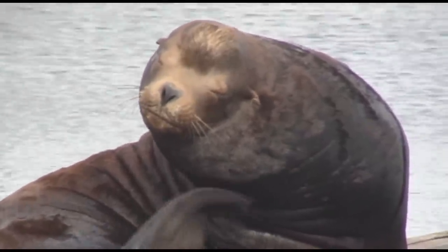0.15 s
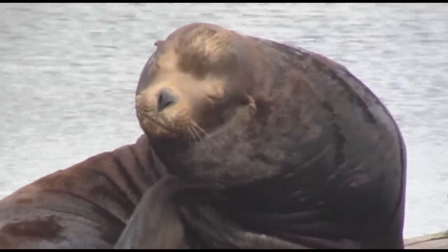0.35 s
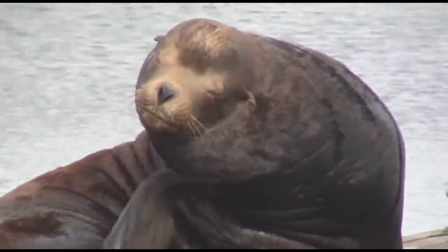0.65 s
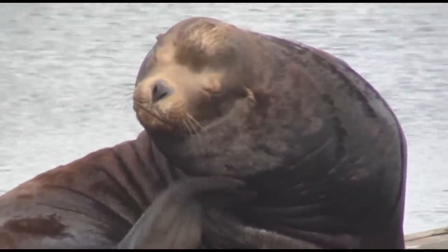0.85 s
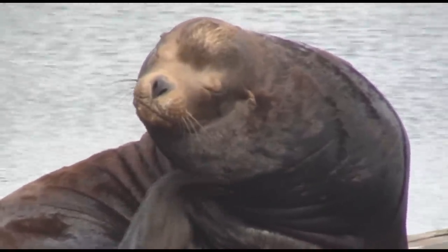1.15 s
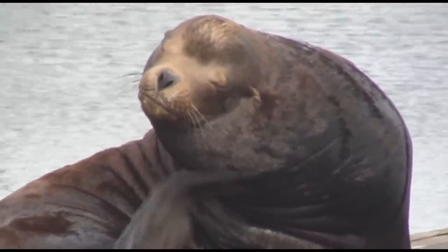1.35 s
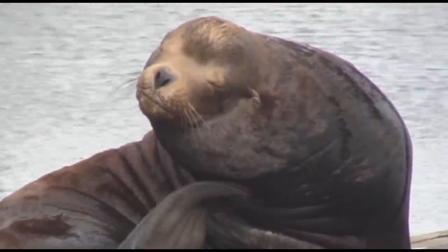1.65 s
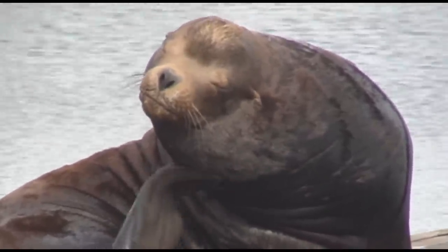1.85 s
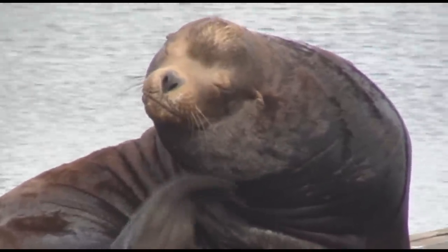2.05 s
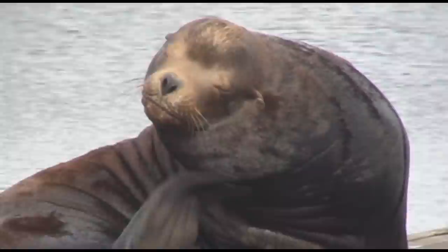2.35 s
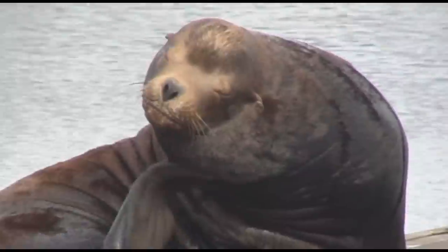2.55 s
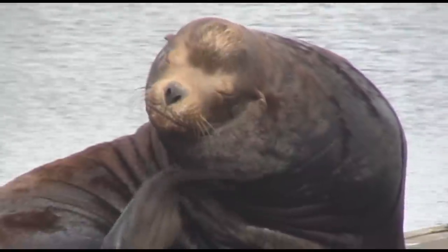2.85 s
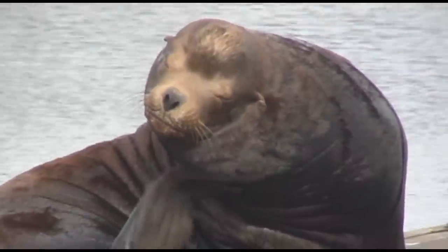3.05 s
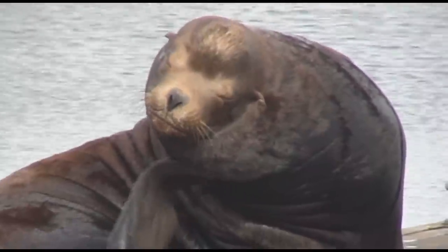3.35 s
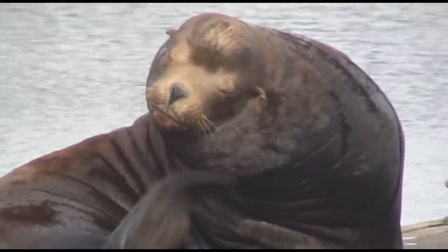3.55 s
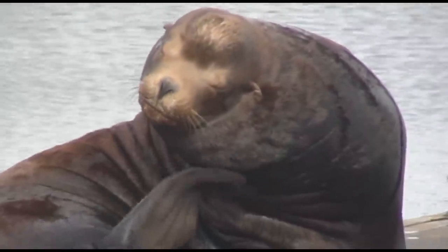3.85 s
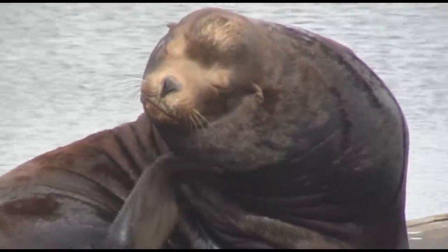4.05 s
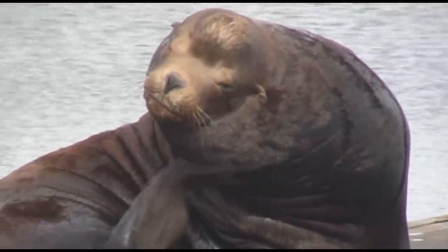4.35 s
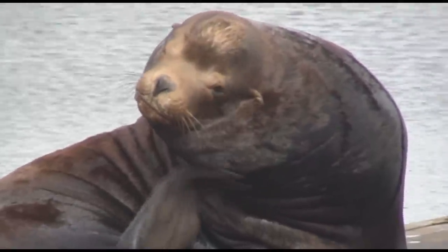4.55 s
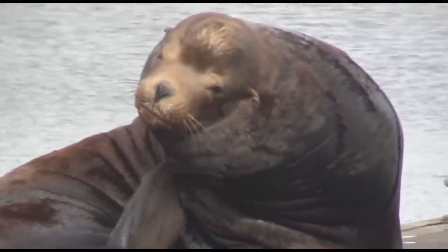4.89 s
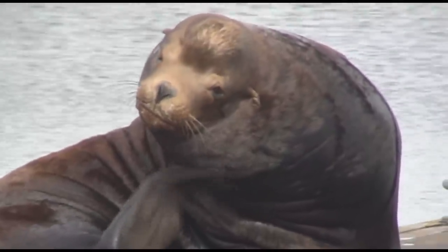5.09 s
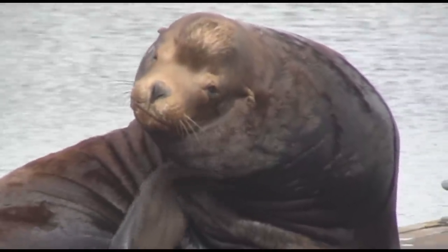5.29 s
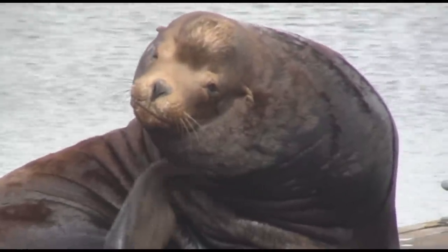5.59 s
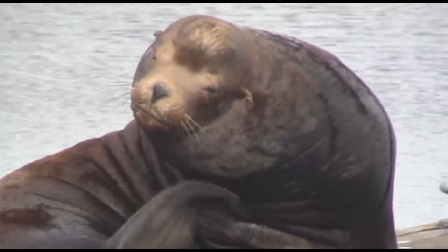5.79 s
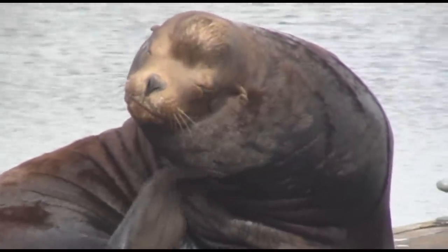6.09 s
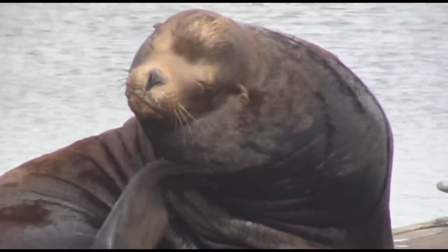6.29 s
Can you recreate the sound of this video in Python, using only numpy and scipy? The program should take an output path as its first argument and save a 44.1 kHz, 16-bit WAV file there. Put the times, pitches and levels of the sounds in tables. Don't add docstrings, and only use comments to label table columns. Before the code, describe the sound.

A sea lion barks a quick, even run of short hoarse yelps across an echoing harbour, over engine hum and wind buffets, then falls silent.

```python
import sys
import numpy as np
from scipy import signal
from scipy.fft import rfft, irfft, next_fast_len
from scipy.io import wavfile
from scipy.ndimage import uniform_filter1d

SR = 44100
rng = np.random.default_rng(int(sys.argv[2]) if len(sys.argv) > 2 else 0)


def field_ratio(decibels):
    return 10 ** (np.asarray(decibels, dtype=float) / 20)


def master_out(mix):
    frames = np.transpose(np.atleast_2d(mix))
    ceiling = np.clip(frames, -1, 1)
    pcm = np.round(ceiling * 32767).astype(np.int16)
    wavfile.write(sys.argv[1], SR, pcm)


N = 283412
T = np.arange(N) / SR
LEAD = int(.2 * SR)
T_CALL = np.arange(-LEAD, N) / SR


def rms_one(x):
    return x / np.sqrt(np.mean(x ** 2, axis=-1, keepdims=True) + 1e-20)


def at_hz(points, hz):
    freq_hz, level_db = np.array(points)[:, :2].T
    return np.interp(np.log(hz + 1), np.log(freq_hz), level_db)


def coloured(x, points):
    size = next_fast_len(x.shape[-1] + 4096)
    gain = field_ratio(at_hz(points, np.fft.rfftfreq(size, 1 / SR)))
    return irfft(rfft(x, size) * gain, size)[..., :x.shape[-1]]


def drift(rate_hz, size=N):
    r = np.exp(-2 * np.pi * rate_hz / SR)
    noise = rng.standard_normal(size + 9000)
    return rms_one(signal.lfilter([1], [1, -2 * r, r * r], noise)[9000:])


def port_difference(left_minus_right_db):
    return field_ratio(left_minus_right_db * np.array([[.5], [-.5]]))


def played(rows):
    s, hz, level_db = np.transpose(rows)
    span = slice(int(s[0] * SR) + LEAD, int(s[-1] * SR) + LEAD)
    t = T_CALL[span]
    pitch = uniform_filter1d(np.interp(t, s, hz), size=260, mode="nearest")
    phase = 2 * np.pi * np.cumsum(pitch) / SR
    fade = np.clip(np.minimum(t - s[0], (s[-1] - t) / 3) / .004, 0, 1)
    return span, pitch, phase, np.interp(t, s, field_ratio(level_db)) * fade


def bark_contour(start, ledge_s, arch_s, top_hz, level_db, scoop):
    jump, end = start + ledge_s, start + ledge_s + arch_s
    lost = (1270 - top_hz) / 100
    tired = max(lost, 0)
    ledge_hz, end_hz = 1030 - 39.8 * lost, 849
    half_jump_s = .011
    shoulder_hz = (.945 + .028 * tired) * top_hz
    drop_s = .027 + .008 * tired
    sag_hz = .978 * top_hz
    falling_db = level_db - 2.5 * lost
    return [(start, ledge_hz - scoop * 210, level_db - 9.5),
            (start + .45 * scoop * ledge_s, ledge_hz - scoop * 55.6, level_db - scoop * 8.5),
            (jump - half_jump_s, ledge_hz, level_db),
            (jump + half_jump_s, shoulder_hz, level_db - 4.5),
            (end - drop_s - .18 * arch_s, top_hz, level_db - 7),
            (end - drop_s, sag_hz, level_db - 4.5),
            (end - drop_s / 2, (sag_hz + end_hz) / 2, falling_db),
            (end, end_hz, falling_db)]


# start_s [s], ledge_s [s], arch_s [s], top_hz [Hz], level_db [dB]
BARKS = [(-.165, 0.062, .12, 1315, -33), (0.161, 0.068, 0.13, 1320, -28.5),
         (0.506, 0.066, 0.13, 1337, -29.5), (0.843, 0.073, 0.11, 1325, -29.5),
         (1.156, 0.074, 0.11, 1297, -30), (1.48, 0.076, 0.1, 1286, -29), (1.792, 0.076, .100, 1285, -27.5),
         (2.110, 0.068, 0.1, 1290, -28), (2.422, 0.069, 0.096, 1253, -28.5),
         (2.724, 0.07, 0.096, 1268, -29), (3.04, .067, .094, 1257, -28), (3.366, 0.07, 0.091, 1232, -28.5),
         (3.693, 0.065, 0.094, 1209, -29), (4.034, .067, 0.089, 1172, -29),
         (4.407, 0.072, 0.067, 1139, -31)]
# time_s [s], strong_weak_depth [0-1], overtones_db [dB], scoop [0-1]
TIRING = [(-.1, 0.16, 9.5, 0.49), (.2, 0.07, 2.5, 0.39), (.55, 0.11, 0.5, 0.55), (.9, 0.08, -1, 1.0),
          (2.598, 0.15, 4, 0.91), (3.8, 0.3, 3, .9), (4.1, 0.47, -2, .9), (4.45, 0.13, 5.5, .8)]
# freq_hz [Hz], level_db [dB]
THROAT = [(300, 2), (600, -4.5), (850, 11.5), (1050, 7), (1350, -6), (1750, -10), (2100, -31), (2550, -19),
          (2850, -26), (3150, -21.5), (3500, -23.5), (3850, -29), (4400, -44.5), (7700, -35.5)]


def barks():
    source = np.zeros(N + LEAD)
    s, *folds = np.transpose(TIRING)
    for bark in BARKS:
        beating, bright_db, scoop = (np.interp(bark[0], s, column) for column in folds)
        ledge_s = bark[1]
        span, pitch, phase, gain = played(bark_contour(*bark, np.clip(scoop, .1, 1.2)))
        size = len(pitch)
        age = np.arange(size) / SR
        progress = age / age[-1]

        def waver(rate_hz):
            return drift(rate_hz, size=2 * LEAD)[:size]

        rattle_s = .6 * ledge_s * np.clip(scoop + 0.25, 0, 1)
        rough = np.clip((rattle_s + .008 - age) / .016, 0, 1)
        phase = phase + (.05 + .25 * beating + .5 * rough) * waver(90)
        puffs = np.exp(3 * np.cos(phase / 4 + 1.5 * waver(30)) - 3)
        bursts = 1 + .8 * rough * (2.2 * puffs - 1)
        half = beating * (.15 + 1.2 * np.exp(-((progress - .48) / .25) ** 2))
        strong_weak = 1 + 2 * half * np.cos(phase / 2 + .7 * waver(70))
        ledge_bright_db = 2 * np.clip((ledge_s - age) / .011, 0, 1)
        closing = field_ratio(ledge_bright_db - 2 * np.clip(progress * 6 - 4.6, 0, 1))
        overtones = 0
        for k in range(2, 9):
            level_db = 2 - 1.5 * k - 8 * (k in (5, 7)) + 2.5 * (k in (3, 4))
            overtones = overtones + field_ratio(4 * waver(50) + level_db) * np.cos(k * phase + k * k)
        air = np.diff(rng.standard_normal(2 * LEAD))[:size]
        rasp = field_ratio(-6 + 5 * rough) * air * (1 + np.cos(phase))
        effort = gain * field_ratio(2 * waver(58) - at_hz(THROAT, pitch))
        voice = np.cos(phase) + field_ratio(bright_db) * closing * overtones + rasp
        source[span] += np.sqrt(2) * effort * bursts * strong_weak * voice
    return coloured(source, THROAT)


# delay_s [s], left_db [dB], right_db [dB]
ECHOES = [
    (.025, -12, -13),
    (.062, -23, -21),
    (.102, -24, -17),
]
# freq_hz [Hz], level_db [dB]
WALLS = [(500, -2), (850, -2), (1050, 1), (1300, 0), (2550, 6), (3200, 8), (3800, 7), (8000, -3)]


def harbour(x):
    tail_t60_s, tail_db, shared = .95, np.array([-11.5, -9.5]), .4
    size = int(.9 * SR)
    t = T[:size]
    scatter = rng.standard_normal((3, size))
    decay = field_ratio(-60 * t / tail_t60_s) * np.clip(t / .04, 0, 1)
    tail = (scatter[:2] + shared * scatter[2]) * decay
    paths = field_ratio(tail_db)[:, None] * rms_one(tail) / np.sqrt(size)
    for delay_s, left_db, right_db in ECHOES:
        arrival = int(delay_s * SR) + rng.integers(0, 12, 2)
        paths[[0, 1], arrival] += field_ratio(np.array([left_db, right_db]))
    wet = signal.fftconvolve(coloured(x, WALLS)[None], paths, axes=1)[:, :len(x)]
    direct = x * field_ratio(np.array([[-.2], [.2]]))
    return (direct + wet)[:, LEAD:]


ENGINE_ORDERS = {4: (-58, -57), 6: (-43, -28), 7: (-60, -50), 8: (-60, -50), 9: (-51, -40.5),
                 10: (-66, -61), 12: (-62, -53), 13: (-66, -59), 16: (-62, -57), 17: (-68, -64),
                 20: (-67, -61), 24: (-65, -68)}


def engine():
    cycle_hz = 15.025
    left_lead_rad = np.array([[1.1], [0]])
    phase = 2 * np.pi * cycle_hz * T + 0.021 * drift(1)
    out = np.zeros((2, N))
    for k, level_db in ENGINE_ORDERS.items():
        wobble = field_ratio(0.17 * drift(2.7))
        wave = np.sin(k * phase + rng.uniform(0, 2 * np.pi) + left_lead_rad)
        out += np.sqrt(2) * field_ratio(np.array(level_db))[:, None] * wobble * wave
    return out


# freq_hz [Hz], density_db [dB per Hz]
BUFFET = [(22, -21), (45, 7.5), (80, 4.5), (130, 5), (200, -6.5), (300, -15.5), (500, -22), (1500, -104)]
# peak_s [s], level_db [dB], left_minus_right_db [dB], half_length_s [s]
GUSTS = [(0.005, -27.5, 14, 0.036), (.2, -32.5, 3, 0.13), (0.661, -38, 4, 0.056), (0.942, -31.5, 5, 0.11),
         (1.253, -30.5, -1, 0.088), (1.478, -30, -6, 0.028), (1.782, -36.5, 0, 0.14),
         (2.09, -32, -1, 0.084), (2.743, -34.5, -1.5, 0.25), (3.076, -44.5, -10, 0.11),
         (3.438, -27.5, 3.5, 0.11), (3.73, -33, -1, 0.11), (4.203, -47.5, 4, 0.25),
         (4.602, -40.5, 23.5, 0.091), (5.084, -41, -8, 0.12), (5.26, -33, 1, 0.076), (5.54, -48, -3, 0.11),
         (5.92, -42, -1, 0.11), (6.38, -40.5, 2, 0.16)]
# left, right [dB]
CALM_DB = [-56.5, -56.5]
# time_s [s], peak_db [dB], pitch_hz [Hz], left_minus_right_db [dB], length [cycles]
THUMPS = [(0.016, -16.5, 199, 5, 0.51), (0.09, -29.5, 121, 18, 0.21), (0.268, -18, 126.3, 9, 0.52),
          (0.657, -22.5, 125, 7, 0.95), (0.933, -23, 118, 12, 0.43), (1.045, -28, 116, 18, 0.67),
          (1.202, -25.5, 121, 20, 0.39), (1.307, -21, 141, 4, 0.9), (2.073, -16.5, 181, 11, 0.32),
          (2.163, -21, 120, -2, 0.51), (2.692, -34, 122, 27, 1), (2.854, -27.5, 141, 18, 0.6),
          (3.139, -21, 117, 2, 0.79), (3.378, -18.5, 122, 4, 0.68), (3.48, -18, 133, 4, 0.39),
          (4.569, -16, 148, 5, 0.71), (4.649, -21, 133, 0, 0.48), (5.284, -16.5, 143, 10, 0.54)]


def wind():
    white = rng.standard_normal((3, N))
    lumps = field_ratio(4 * np.array([drift(20), drift(12)]))
    buffeting = rms_one(coloured(white[:2] + 1.02 * white[2], BUFFET))
    strength = field_ratio(np.array(CALM_DB))[:, None]
    for at, gust_db, pan_db, half_s in GUSTS:
        swell = np.exp(-((T - at) / half_s) ** 2)
        strength = strength + field_ratio(gust_db) * port_difference(pan_db) * swell
    out = rms_one(buffeting * lumps) * strength
    for at, peak_db, hz, pan_db, cycles in THUMPS:
        turns = (T - at) * hz - .8
        eddy = -np.exp(-(turns / cycles) ** 2) * np.cos(2 * np.pi * turns)
        out += field_ratio(peak_db - 3) * port_difference(pan_db) * eddy
    return out


# freq_hz [Hz], density_db [dB per Hz]
FAR = [(88, -35), (150, -8.5), (186, -9.5), (346, -9.5), (397, -11), (574, -11.5), (646, -13.5),
       (971, -13.5), (1050, -16.5), (1610, -22), (9280, -37.5), (13400, -31.5), (15700, -33.5)]


def far_hiss():
    level_db, alike = -45, .2
    mid, side = rng.standard_normal((2, N))
    pair = np.sqrt(1 + alike) * mid + np.sqrt(1 - alike) * side * [[1], [-1]]
    return field_ratio(level_db + .5 * drift(0.33)) * rms_one(coloured(pair, FAR))


# time_s [s], pitch_hz [Hz], level_db [dB]
GRUNTS = [
    [(.715, 701, -60), (.735, 731, -37), (.75, 675, -35), (.765, 670, -60)],
    [(.74, 443, -66), (.765, 448, -44.5), (.79, 467, -43.5), (.815, 405, -55)],
    [(.71, 1313, -36), (.76, 1345, -52), (.82, 1298, -39), (.89, 1285, -36)],
]
GRUNT_TILT_DB = [-10.5, -2, -22]


def grunts():
    out = np.zeros(N + LEAD)
    for rows, tilt_db in zip(GRUNTS, GRUNT_TILT_DB):
        span, pitch, phase, gain = played(rows)
        stack = sum(field_ratio(tilt_db * k) * np.cos((k + 1) * phase + k * k) for k in range(8))
        out[span] += gain * stack
    return out


# start_s [s], end_s [s], pitch_hz [Hz], level_db [dB], fading [dB per s]
WHINES = [
    (1.0, 1.62, 10070, -76, 1),
    (5.95, 6.43, 10070, -75, 1),
    (2.78, 2.86, 5610, -62, 80),
    (3.115, 3.25, 5610, -55, 140),
    (3.41, 3.53, 5610, -71, 15),
]


def motor_whines():
    out = np.zeros(N)
    for start, end, hz, level_db, fading_db in WHINES:
        flutter = field_ratio(2.5 * drift(45))
        gate = np.clip(np.minimum(T - start, (end - T) / 4) / .012 + .5, 0, 1)
        level = field_ratio(level_db - fading_db * np.abs(T - start))
        out += np.sqrt(2) * level * flutter * gate * np.sin(2 * np.pi * hz * T)
    return out


# time_s [s], level_db [dB]
TICKS = [
    (3.2654, -33),
    (6.272, -35.5),
]
# freq_hz [Hz], level_db [dB], t60_s [s]
CASE = [(997, 8, 0.017), (1290, 3, 0.045), (3110, 2.5, 0.009), (4650, -7.5, 0.016), (6200, -7, .005),
        (8070, 1.5, 0.0036), (10000, -8, 0.0048), (11600, -0.5, 0.0062), (14000, -7, .003)]


def case_ticks():
    out = np.zeros(N)
    for hz, level_db, t60 in CASE:
        clicks = np.full(N, 1e-18)
        for at, tick_db in TICKS:
            start = int((at + 1.6 / hz) * SR)
            clicks[start] += field_ratio(tick_db + level_db)
            clicks[start + int(.009 * SR)] += field_ratio(tick_db + level_db - hz / 250)
        r, w = field_ratio(-60 / (t60 * SR)), 2 * np.pi * hz / SR
        out += signal.lfilter([0, np.sin(w)], [1, -2 * r * np.cos(w), r * r], clicks)
    return out


# time_s [s], level_db [dB]
SCRATCH = [
    (5.0, -71),
    (5.02, -51.5),
    (5.07, -50.5),
    (5.09, -75),
]


def scratch():
    s, level_db = np.transpose(SCRATCH)
    clicks_per_s = 2500
    grains = rng.standard_normal((2, N)) * (rng.random((2, N)) < clicks_per_s / SR)
    band = signal.butter(2, [1700, 3600], "band", fs=SR, output="sos")
    stroke = field_ratio(np.interp(T, s, level_db, left=-120, right=-120))
    return stroke * rms_one(signal.sosfilt(band, grains))


def scene():
    animals = harbour(barks() + grunts())
    surroundings = engine() + wind() + far_hiss()
    return animals + surroundings + motor_whines() + case_ticks() + scratch()


def roll_off(x):
    return signal.sosfilt(signal.butter(12, 16660, fs=SR, output="sos"), x)


def record(dry):
    top = signal.cheby2(16, 40, 15900, fs=SR, output="sos")
    left_top = signal.cheby2(12, 30, 11700, fs=SR, output="sos")
    both = signal.sosfiltfilt(top, dry)
    left = signal.sosfiltfilt(left_top, both[0])
    return roll_off(np.array([left, both[1]]))


dry = scene()
out = record(dry)
master_out(out)
```